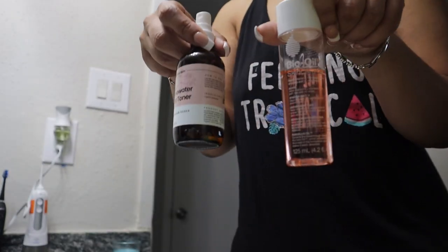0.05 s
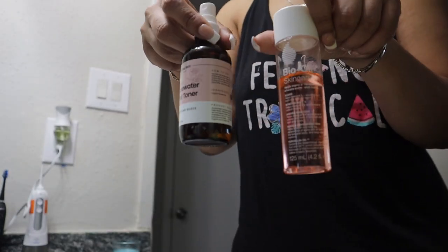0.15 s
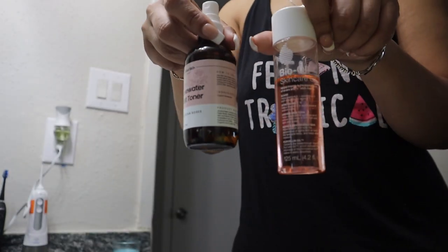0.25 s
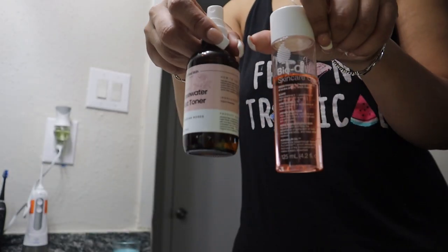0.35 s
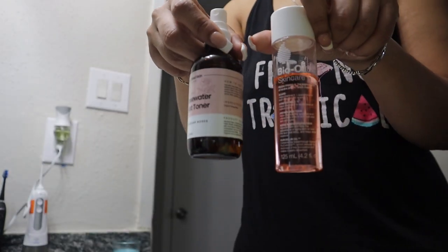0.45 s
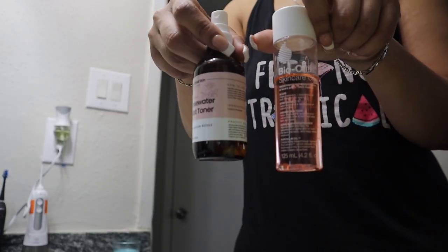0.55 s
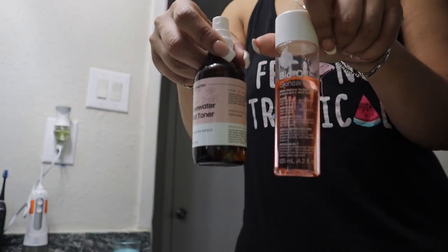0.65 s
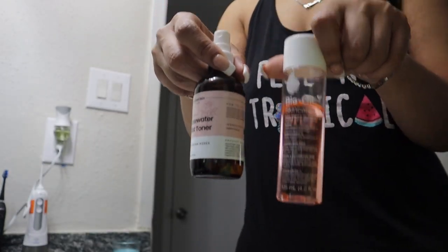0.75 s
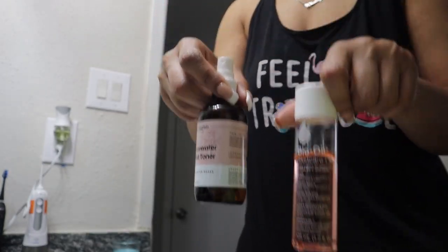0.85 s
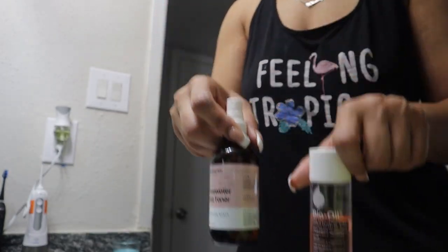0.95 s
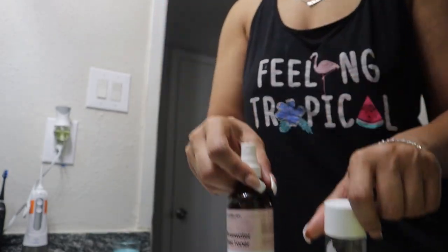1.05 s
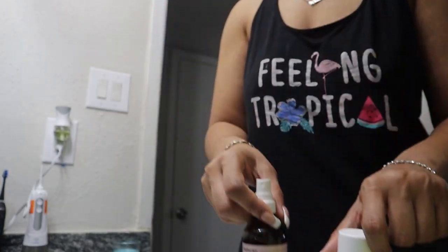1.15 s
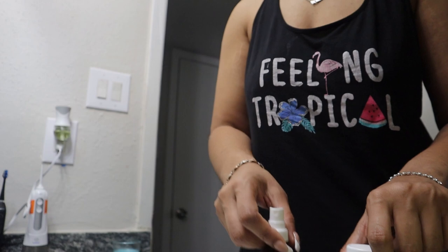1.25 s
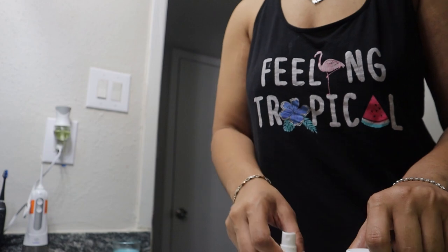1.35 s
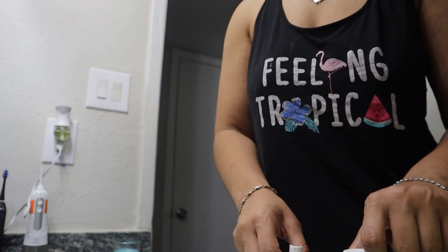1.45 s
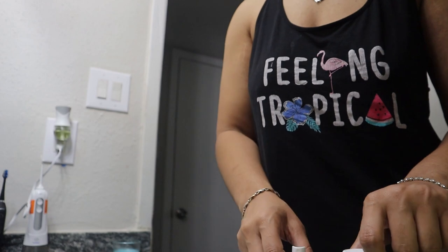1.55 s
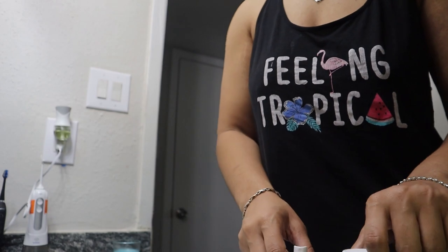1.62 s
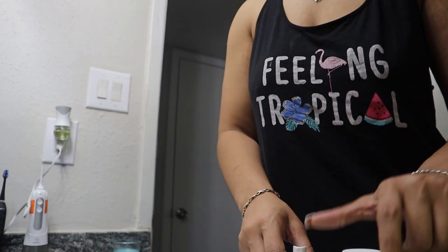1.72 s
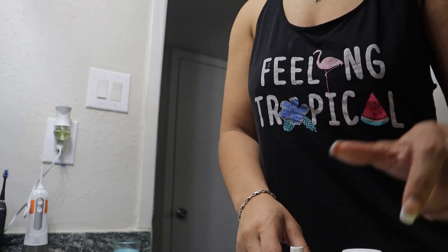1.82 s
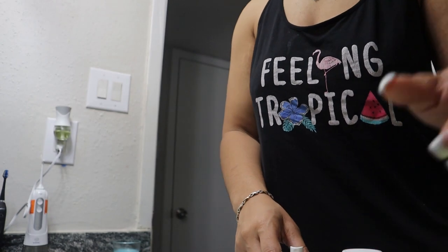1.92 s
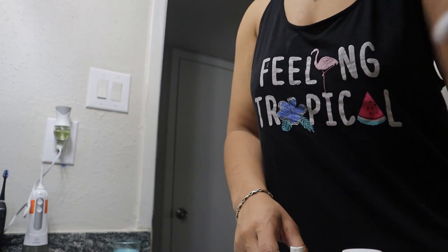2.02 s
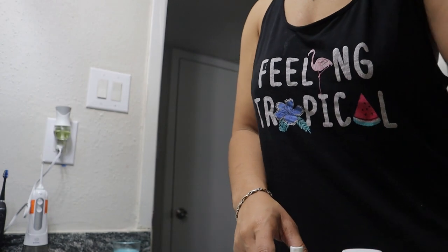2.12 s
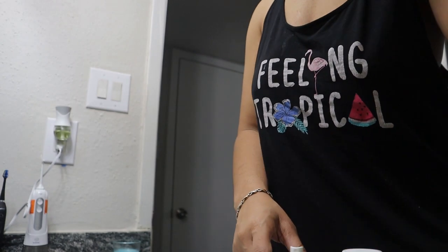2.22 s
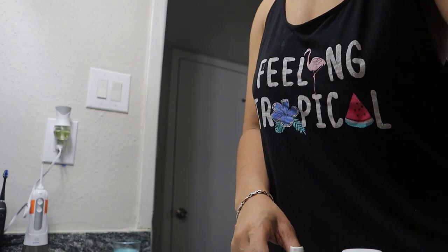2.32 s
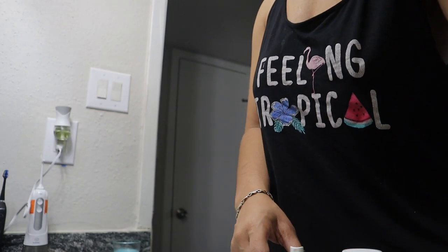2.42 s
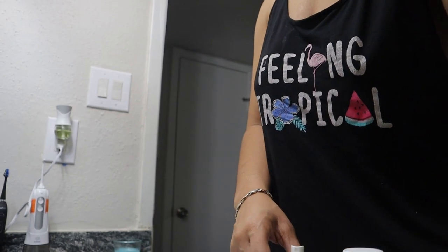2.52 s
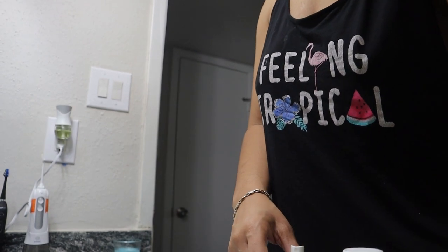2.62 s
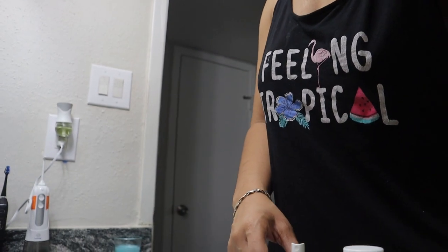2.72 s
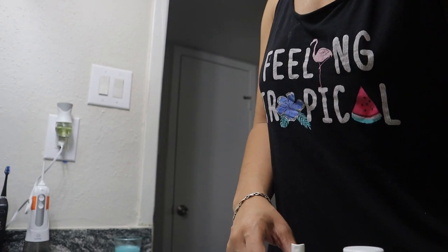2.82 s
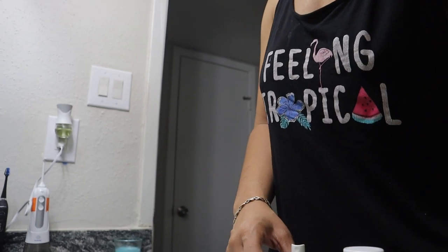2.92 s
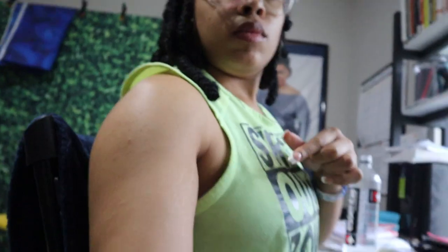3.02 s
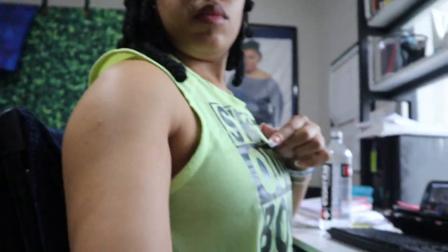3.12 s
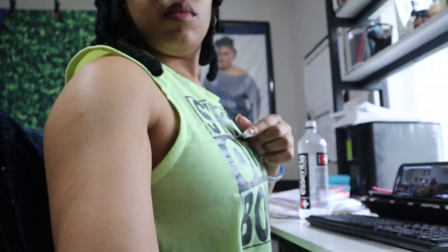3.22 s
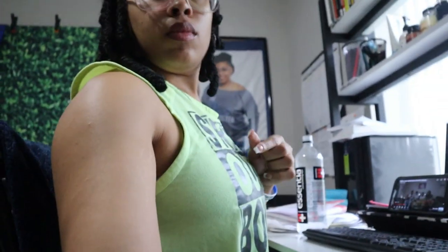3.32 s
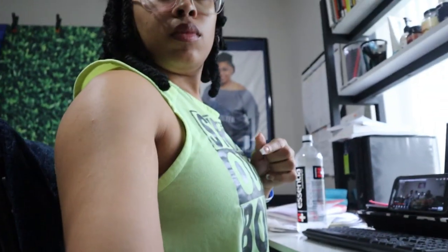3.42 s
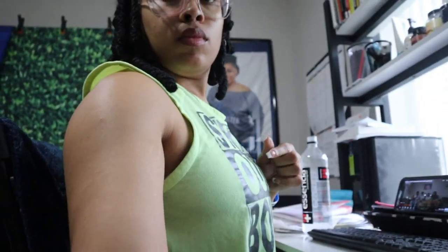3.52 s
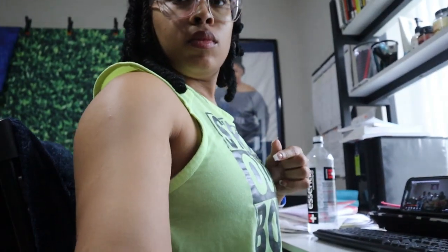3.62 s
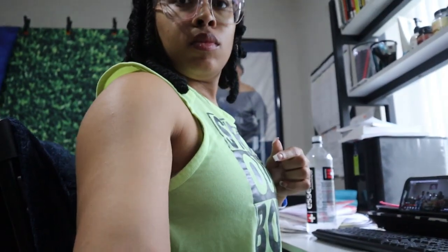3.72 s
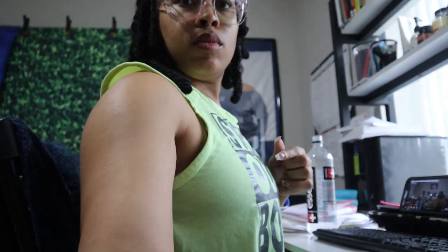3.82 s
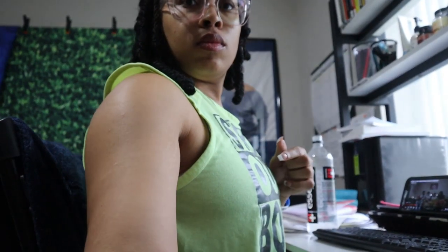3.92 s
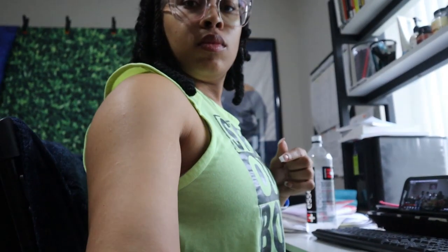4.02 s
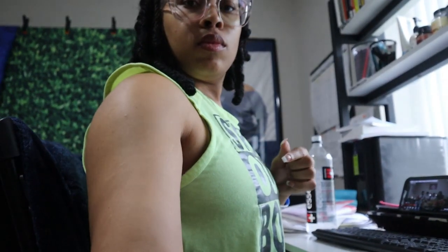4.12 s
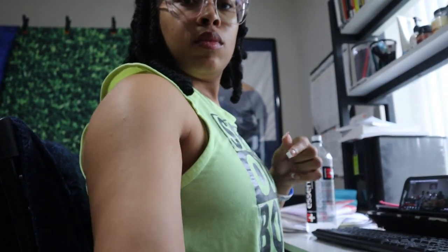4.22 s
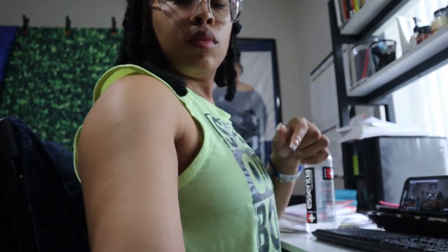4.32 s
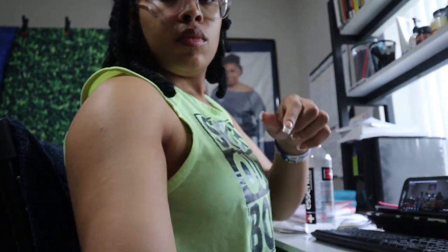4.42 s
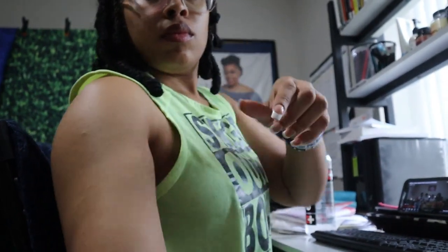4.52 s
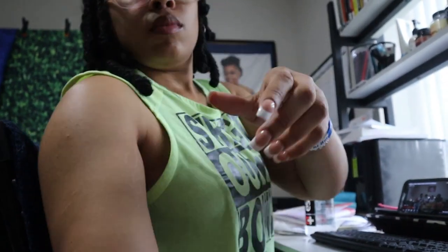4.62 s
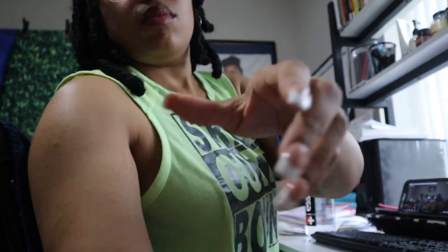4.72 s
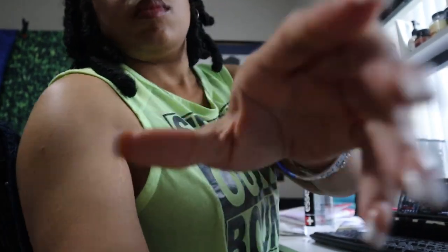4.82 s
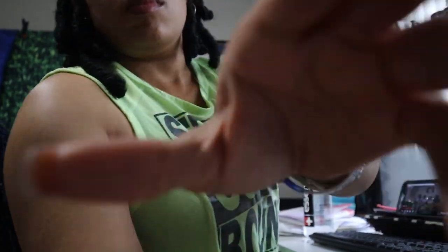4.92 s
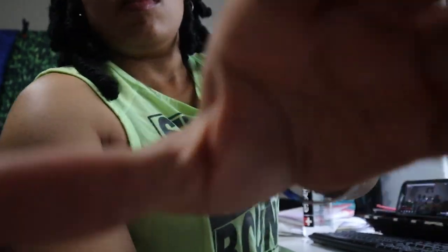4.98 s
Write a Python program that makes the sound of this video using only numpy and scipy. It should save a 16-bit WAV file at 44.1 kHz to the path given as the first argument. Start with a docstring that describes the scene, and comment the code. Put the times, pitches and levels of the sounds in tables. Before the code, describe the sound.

In a bare, slightly echoing bathroom with low hum and soft hiss, a glass bottle thuds on a stone counter, then a plastic one knocks louder and rocks as it settles. A hand brushes the camera with a dry hiss and a button clicks close by. After a tiny gap, in a quieter-humming study, close bumps, nail ticks and cloth shuffles are followed by light taps and a dull knock.

```python
"""A low hum with soft rumble and hiss is heard first; then a glass and a plastic bottle are set on stone.
A hand brushes the camera with a dry hiss and a button clicks. After a very short silence, in a study,
fingers tick and bump on the camera, cloth shuffles and something knocks dully.
Impacts are pulses, noise and decaying modes; friction is shaped noise; the hum is a few sines."""
import sys
import numpy as np
from scipy import signal
from scipy.fft import rfft, irfft, next_fast_len
from scipy.io import wavfile
from scipy.ndimage import uniform_filter1d

SR = 44100
rng = np.random.default_rng(int(sys.argv[2]) if len(sys.argv) > 2 else 0)


def master_out(mix):
    """Clip the mix to full scale and print it as 16-bit PCM to the path in sys.argv[1]."""
    frames = np.transpose(np.atleast_2d(mix))
    ceiling = np.clip(frames, -1, 1)
    pcm = np.round(ceiling * 32767).astype(np.int16)
    wavfile.write(sys.argv[1], SR, pcm)


N = 222749
TIME = np.arange(N) / SR

# In every table named spectrum or width the columns are (frequency [Hz], relative level [dB]).
# In every table of modes: (frequency [Hz], relative level [dB], decay t60 [s]).
# In every table of hits: (time [s], level [dB], brightness [dB per octave], contact noise t60 [s]).

# silence between the two rooms: (start [s], end [s])
SILENCE = (2.974, 3.011)
# stereo width of distant impacts, side against mid: (frequency [Hz], relative level [dB])
FAR_WIDTH = [(60, -67), (300, -27.5), (800, -20), (1600, -13), (2600, -10.5), (4200, -2.5), (10000, 5)]


def amp(db):
    """Level as a logarithm: decibels to amplitude gain."""
    return 10 ** (np.asarray(db) / 20)


def rms(x):
    """Effective value: the root of the mean power."""
    return np.sqrt(np.mean(x ** 2) + 1e-20)


def colour(x, spectrum, tilt_db=0):
    """Minimum-phase filtering: the folded cepstrum of a spectrum, tilted per octave, gives a causal response."""
    size = 2 * next_fast_len(x.shape[-1] // 2 + SR // 20)
    octave = np.log2(np.maximum(np.arange(size // 2 + 1) * SR / size, 10))
    hz, db = np.transpose(spectrum)
    gain_db = np.interp(octave, np.log2(hz), db) + tilt_db * (octave - octave.mean())
    cepstrum = irfft(np.log(amp(gain_db)))
    # fold the negative times onto the positive ones
    cepstrum[1:size // 2] *= 2
    cepstrum[size // 2 + 1:] = 0
    response = np.exp(rfft(cepstrum))
    return irfft(rfft(x, size) * response)[..., :x.shape[-1]]


def tilted(x, tilt_db):
    """Spectral tilt: a constant slope in dB per octave makes a sound brighter or duller."""
    return colour(x, [(1000, 0)], tilt_db)


def noise(spectrum):
    """Stationary coloured noise: filtered white noise, scaled to rms 1."""
    x = colour(rng.standard_normal(N), spectrum)
    return x / rms(x)


def drift(rate):
    """Slow random modulation: chance values, rate per second, joined by straight lines."""
    return np.interp(TIME * rate, np.arange(N), rng.standard_normal(N))


def stereo(mid, side):
    """Sum and difference: left and right from mid and side."""
    return np.array([mid + side, mid - side])


def add(out, s, x):
    """Superposition: mix a short sound in at time s."""
    start = round(s * SR)
    out[..., start:start + x.shape[-1]] += x[..., :N - start]


def blows(rows, modes, spectrum, width, push_db, modes_db, room_db, room_t60):
    """Impact: a contact pulse and a brief noisy rattle, the body's decaying modes, and a reverberant tail."""
    out, t = np.zeros((2, N)), TIME[:SR // 2]
    onset_s = 0.00055   # a contact takes this long to set the modes ringing
    ring = 0
    for k, (hz, db, t60) in enumerate(modes):
        # neighbouring modes start with opposite signs
        ring = ring + (-1) ** k * amp(db - 60 * t / t60) * np.sin(2 * np.pi * hz * t)
    ring = ring * np.tanh(t / onset_s) ** 2
    push = colour(1. * (t == 0), spectrum)
    direct = amp(push_db) * push / rms(push) + amp(modes_db) * ring / rms(ring)
    tail_envelope = amp(-60 * t / room_t60) * (1 - np.exp(-t / 0.0015))
    for s, level_db, tilt_db, t60 in rows:
        rattle = colour(rng.standard_normal((2, len(t))) * amp(-60 * t / t60), spectrum)
        tail = colour(rng.standard_normal((2, len(t))) * tail_envelope, spectrum)
        diffuse = rattle / rms(rattle) + amp(room_db) * tail / rms(tail)
        mid, side = tilted(direct + diffuse, tilt_db)
        gain = amp(level_db) / rms(mid[:SR // 50])   # level of the mid over the first 20 ms
        add(out, s, gain * stereo(mid, colour(side, width)))
    return out


def stroke(start, length, level_db, swell_db, attack_s, release_t60, arch_db):
    """Friction envelope: a rubbing movement takes hold, arches midway, swells or slackens, then lifts off."""
    t = TIME - start
    progress = np.clip(t / length, 0, 1)
    lift_db = 60 * np.maximum(t - length, 0) / release_t60
    gain_db = level_db + swell_db * (progress - .5) + arch_db * np.sin(np.pi * progress) - lift_db
    return np.clip(t / attack_s, 0, 1) * amp(gain_db)


def room_tone(mid_db=-46.5, side_db=-50, waver_db=2.0, wander=0.36, study_hum_db=-4.0):
    """Stationary background: rumble and wide hiss under mains harmonics that waver, weaker in the study."""
    # mains hum in the bathroom, before wavering: (frequency [Hz], rms level [dB])
    hum_lines = [(119.7, -48), (240, -63), (359, -60.5)]
    # room air common to both ears: (frequency [Hz], relative level [dB])
    air_mid_spectrum = [(20, -6), (40, 1), (80, 3.5), (160, -3), (260, -9.5), (500, -16.5), (1000, -19),
                        (2000, -24), (4000, -30.5), (8000, -40), (11500, -44.5), (16000, -75)]
    # room air opposed between the ears: (frequency [Hz], relative level [dB])
    air_side_spectrum = [(25, -13), (114, 4), (223, 9), (263, 10.5), (659, 8.5), (863, 6.5), (1290, 5),
                         (2350, 0), (2550, 0.5), (6740, -10.5), (14000, -24.5), (16000, -50.5)]
    hum = 0
    for hz, db in hum_lines:
        level = np.sqrt(2) * amp(db + waver_db * drift(3.7))
        phase = 2 * np.pi * hz * TIME + wander * drift(5.16)   # wander in radians
        hum = hum + level * np.sin(phase)
    hum = hum * amp(study_hum_db * (TIME > SILENCE[1]))
    return stereo(hum + amp(mid_db) * noise(air_mid_spectrum), amp(side_db) * noise(air_side_spectrum))


def cloth(flutter_db=1.7, grain_db=3):
    """Textile friction: a dull scuff and a bright swish share the power; the weave roughens both."""
    # shuffles: (start [s], length [s], level [dB], swell from start to end [dB], power share of swish [0-1])
    shuffles = [(3.504, 0.217, -53.5, 2, 0.05), (3.82, 0.038, -43, 7, 0.01), (3.873, 0.04, -45, 13, 0.6),
                (3.946, 0.082, -49.5, -10, 0.5), (4.038, 0.014, -50, 5, 0.7), (4.16, 0.088, -56, -5, 0.19),
                (4.325, 0.051, -50.5, 8, 0.02), (4.451, 0.24, -59, -8, 0.4)]
    # dull scuff: (frequency [Hz], relative level [dB])
    scuff_spectrum = [(120, -6.5), (300, 7), (700, -1.5), (900, -3.5), (1250, 1), (2000, -28), (5000, -58)]
    # bright swish: (frequency [Hz], relative level [dB])
    swish_spectrum = [(400, -19), (1000, -6), (1350, 2), (1750, -0.5), (2350, 8), (2900, 2.5), (3300, -2),
                      (4300, -11), (12000, -31), (16000, -56)]
    # side against mid: (frequency [Hz], relative level [dB])
    cloth_width = [(200, -23), (1200, -4), (2400, -7), (3600, 4), (10000, 9)]
    scuff, swish = 0, 0
    for *movement, bright in shuffles:
        gain = stroke(*movement, attack_s=0.015, release_t60=0.12, arch_db=1)
        bright = np.clip(bright, 0, 1)
        scuff = scuff + gain * np.sqrt(1 - bright)
        swish = swish + gain * np.sqrt(bright)
    mid, side = [scuff * noise(scuff_spectrum) + swish * noise(swish_spectrum) for _ in range(2)]
    grit = amp(flutter_db * drift(90) + grain_db * drift(900))
    return grit * stereo(mid, colour(side, cloth_width))


def brush(grain_db=1.5, flutter_db=1.5, snag_t60=0.024, lean=0.36, catches_per_s=200, catch_db=16):
    """Stick-slip friction: uneven tiny slips, small catches and bigger snags of skin, leaning to the right."""
    # strokes: (start [s], length [s], level before tilt [dB], swell from start to end [dB],
    #           brightness [dB per octave], release t60 [s])
    strokes = [(2.004, 0.024, -41.5, 6, 0.5, 0.11), (2.036, 0.05, -45, 7, 0.5, .2),
               (2.071, 0.047, -41, 5, 0.9, 0.21), (2.117, 0.045, -40.5, 2.5, 0, 0.28),
               (2.262, 0.31, -49, -5, 0.1, 0.39), (2.603, 0.38, -59.5, -15, -0.5, 0.31),
               (3.361, 0.012, -40, -9, 1.5, .28), (3.425, 0.051, -51, 5, 0, 0.23),
               (3.935, .015, -56, -8, 8, 0.34), (4.674, 0.32, -60.5, 7.5, -1, 0.5)]
    # skin catches and slips: (time [s], level before tilt [dB], brightness [dB per octave])
    snags = [(2.018, -47, -0.5), (2.0552, -43, 1.5), (2.0754, -33, 3.5), (2.081, -44, -0.5),
             (2.088, -44, 2.5), (2.1482, -49.5, -4.5), (2.2593, -53, -2), (2.442, -49, 2), (2.475, -58, 6),
             (2.553, -47, 0), (2.616, -50.5, 3), (3.527, -53, 4)]
    # dry hiss: (frequency [Hz], relative level [dB])
    hiss_spectrum = [(210, -62), (350, -5.5), (754, 0.5), (817, 1), (974, -1.5), (1820, -2.5), (2200, 2),
                     (2500, 0.5), (3500, -2.5), (8310, -17), (10700, -8.5), (13900, -27), (16000, -78)]
    # side against mid: (frequency [Hz], relative level [dB])
    brush_width = [(200, -18), (1000, -13), (2400, -9), (4400, 0), (8000, 4.5), (15000, 10)]
    grit = rng.standard_normal((2, N)) * amp(grain_db * drift(1500) + flutter_db * drift(110))
    catches = rng.random(N) < catches_per_s / SR   # at random moments
    grit += amp(catch_db) * catches * rng.standard_normal((2, N))
    grit /= rms(grit)
    slips = np.zeros((2, N))
    for s, length, db, swell_db, tilt_db, release_t60 in strokes:
        rub = grit * stroke(s, length, db, swell_db, attack_s=0.01, release_t60=release_t60, arch_db=3)
        add(slips, s, tilted(rub[:, round(s * SR):][:, :SR], tilt_db))
    snag_decay = amp(-60 * TIME[:SR // 50] / snag_t60)
    for s, db, tilt_db in snags:
        snag = rng.standard_normal((2, SR // 50)) * snag_decay
        add(slips, s, amp(db) * tilted(snag / rms(snag), tilt_db))
    # white noise of rms 1 would leave the hiss filter at rms 1
    mid, side = colour(slips, hiss_spectrum) / rms(colour(rng.standard_normal(N), hiss_spectrum))
    leaning_side = (side - lean * mid) / np.hypot(1, lean)
    return stereo(mid, colour(leaning_side, brush_width))


def handling(button_pan_db=2.0):
    """Near-field impacts: clicks and soft bumps at the microphone with little room, and a knock further off."""
    # side against mid close by: (frequency [Hz], relative level [dB])
    near_width = [(60, -24), (300, -19), (700, -20.5), (1300, -2.5), (2200, -3), (3600, 8), (7000, 1.5),
                  (14000, 5)]
    # Hits: (time [s], level [dB], brightness [dB per octave], contact noise t60 [s])
    # Modes: (frequency [Hz], relative level [dB], decay t60 [s])
    # Spectra: (frequency [Hz], relative level [dB])
    # a button is touched, then clicks: hits, modes, spectrum
    button_hits = [(2.803, -42, -4, 0.076), (2.8467, -23.5, 0.5, 0.0091), (2.8525, -33, -3, 0.0098),
                   (2.8605, -43, 0, 0.0082)]
    button_modes = [(1080, 3.5, 0.022), (1273, 0.5, 0.032), (1950, -3.5, 0.03), (2595, -20.5, 0.034),
                    (2920, -22, 0.015), (3750, -10, 0.018)]
    button_spectrum = [(60, -45), (350, -11), (700, -4.5), (1150, 13), (1600, -8), (2100, -4),
                       (4000, -11.5), (7000, -19.5), (10500, -26), (16000, -67)]
    # fingernails on the camera shell: hits, modes, spectrum
    nail_hits = [(3.083, -38, 0, 0.065), (3.177, -37, 0, 0.051), (3.3648, -31.5, -1, 0.053),
                 (3.3678, -25, -6, 0.012), (3.3772, -28, -3.5, 0.027), (3.391, -35.5, 0, 0.026),
                 (3.4235, -33.5, -5.5, 0.02), (3.4655, -43, -2.5, 0.022), (3.4695, -35, -5, .03),
                 (3.510, -33.5, -5.5, 0.03), (3.566, -50, -3.5, .02), (3.585, -48, -2.5, 0.058),
                 (3.640, -44.5, -1, .025), (3.700, -47, -5, 0.034), (3.837, -52, -1, 0.018),
                 (3.867, -43, -4, .02), (3.8715, -41, -4, 0.012), (3.9015, -44.5, -0.5, 0.022),
                 (3.910, -41.5, 1, 0.023), (4.06, -50, 5.5, 0.037)]
    shell_modes = [(365, -2, 0.039), (990, 9, 0.023), (1330, 2.5, 0.053), (2330, -4, 0.019),
                   (4200, -31, 0.045)]
    shell_spectrum = [(25, -11.5), (90, 2), (250, -1.5), (600, 4.5), (1200, 2.5), (1600, -3), (2400, -1),
                      (4000, -18), (7000, -35), (10500, -38), (16000, -58)]
    # dry crackles as the grip shifts: hits, modes, spectrum
    crackle_hits = [(3.364, -40, -3.5, 0.017), (3.392, -47.5, -1.5, .02), (3.4287, -56, 3, .015),
                    (3.434, -50, 0, .02), (3.439, -56.5, -2, .015), (3.4535, -50, -4, .015),
                    (3.4645, -49.5, 3, .015)]
    crackle_modes = [(2250, 8, 0.027), (4180, 3, .05), (4770, -1, 0.045), (5640, -3, 0.036)]
    crackle_spectrum = [(500, -18), (2200, 5.5), (3300, -9), (5000, 0), (8000, -8), (10500, -10),
                        (16000, -44)]
    # light, hollow taps: hits, modes, spectrum
    tap_hits = [(4.7587, -35, 1, 0.0067), (4.7618, -41.5, 3, 0.0079), (4.806, -49, -4, 0.04),
                (4.821, -50, -4, 0.034), (4.891, -44, -0.5, 0.024), (4.894, -36.5, -2, .015)]
    tap_modes = [(410, -9, 0.056), (1060, 4, 0.036), (1340, 3, 0.02), (2280, -14, 0.015)]
    tap_spectrum = [(40, -16), (400, 8.5), (700, -3.5), (1300, -1), (1700, -6), (2300, 2), (3200, -23),
                    (7000, -39), (16000, -65)]
    # one sharp snap that leaves a faint ring: hits, modes, spectrum
    snap_hits = [(3.9378, -29, 4, 0.0063), (3.9398, -28, 0, 0.0027)]
    snap_modes = [(990, 3, 0.025), (1325, 10, 0.024), (1320, -16.5, 0.36), (1775, 9, 0.028),
                  (2267, 8, 0.038), (2275, -11, 0.27), (2510, 3, 0.023), (2820, 8.5, 0.013),
                  (4550, 2, 0.0089)]
    snap_spectrum = [(50, 10), (120, 10), (400, 11), (1000, -4), (2600, 1), (3800, -8), (5200, -3.5),
                     (8000, -19), (10500, -12), (16000, -45)]
    # soft bumps of the hand on the camera: hits, modes, spectrum
    bump_hits = [(3.361, -19, -1.5, 0.053), (3.369, -26, -4.5, 0.086), (3.382, -24, 5.5, 0.043),
                 (3.4215, -27, 3, 0.081), (3.4275, -26, 2.5, 0.29), (3.5055, -24.5, -1, 0.048),
                 (3.509, -23.5, 2.5, 0.048), (3.526, -37, -2.5, 0.043), (3.591, -43, -2, .04),
                 (3.645, -39.5, -2.5, 0.24), (3.725, -37.5, -8.5, 0.4), (4.074, -28.5, -1, 0.047)]
    bump_modes = [(46.3, 5.5, 0.27), (100, 1, 0.047), (145, 10, 0.043), (221.6, 14, 0.072),
                  (304, 0.5, 0.17), (449, -0.5, 0.048)]
    bump_spectrum = [(20, -20), (45, 9.5), (110, 2.5), (200, 2.5), (300, -3.5), (480, -12), (900, -25.5),
                     (1800, -41), (5000, -65.5), (11000, -80), (16000, -105)]
    # dull knock with a rebound: hits, modes, spectrum
    knock_hits = [(4.9076, -16.5, -1, 0.025), (4.9168, -27, 3, 0.043), (4.9365, -27.5, -2.5, 0.039)]
    knock_modes = [(202, -7, 0.19), (232, -4, 0.19), (259.4, 4, 0.19), (283, -3.5, 0.2), (373, -1, 0.15),
                   (465, -6, 0.13), (585, -0.5, 0.048), (685, -3.5, 0.055), (803, -6.5, 0.077),
                   (963, -17, 0.14), (1930, -24, 0.1)]
    knock_spectrum = [(30, -27), (130, -16.5), (255, 4), (400, -7.5), (690, -11), (900, -20), (1300, -33),
                      (1900, -28), (3000, -40.5), (8000, -61), (16000, -88)]
    button = blows(button_hits, button_modes, button_spectrum, near_width,
                   push_db=-1, modes_db=6.0, room_db=-10.0, room_t60=0.15)
    button = button * amp([[-button_pan_db], [button_pan_db]])   # towards the right
    clicks = blows(nail_hits, shell_modes, shell_spectrum, near_width,
                   push_db=-1.0, modes_db=-1.5, room_db=-8.5, room_t60=0.32)
    crackles = blows(crackle_hits, crackle_modes, crackle_spectrum, near_width,
                     push_db=-7, modes_db=-3.5, room_db=-0.5, room_t60=0.21)
    taps = blows(tap_hits, tap_modes, tap_spectrum, near_width,
                 push_db=-2.0, modes_db=4, room_db=-7.5, room_t60=0.4)
    snap = blows(snap_hits, snap_modes, snap_spectrum, near_width,
                 push_db=-13.0, modes_db=-0.5, room_db=-14.5, room_t60=0.14)
    bumps = blows(bump_hits, bump_modes, bump_spectrum, near_width,
                  push_db=2, modes_db=2, room_db=-7, room_t60=.35)
    knock = blows(knock_hits, knock_modes, knock_spectrum, FAR_WIDTH,
                  push_db=-6.5, modes_db=6.5, room_db=2.5, room_t60=0.26)
    return button + clicks + crackles + taps + snap + bumps + knock


def bottles():
    """Modal impact: glass thuds and tinkles, hollow plastic knocks, and the bare bathroom reverberates."""
    # Hits: (time [s], level [dB], brightness [dB per octave], contact noise t60 [s])
    # Modes: (frequency [Hz], relative level [dB], decay t60 [s])
    # Spectra: (frequency [Hz], relative level [dB])
    # glass bottle meets the counter and is later nudged: hits, modes, spectrum
    glass_hits = [(1.389, -41.5, 8, 0.016), (1.3918, -16.5, 1, 0.01), (1.395, -29, 2.5, 0.024),
                  (1.416, -32, 2, .04), (1.733, -41.5, -4, .06), (1.762, -35.5, -2.5, .04)]
    glass_modes = [(69, -2.5, 0.48), (228.4, 1.5, 0.38), (302, -7, 0.3), (375, -14, 0.23),
                   (457, -18.5, 0.73), (853, -14.5, 0.14), (1710, -13, 0.17), (2380, -22, 0.073),
                   (3900, -15, 0.19), (4080, -22.5, 0.091), (4170, -22.5, 0.032)]
    glass_spectrum = [(30, -39.5), (75, -2), (130, -12), (230, -2.5), (305, 0), (430, -10.5), (600, -27.5),
                      (1200, -38.5), (1700, -32), (2400, -28), (3300, -45), (3950, -33.5), (4600, -51.5),
                      (10000, -73.5), (16000, -89)]
    # plastic bottle lands while still gripped: hits, modes, spectrum
    # its close pair of modes near 4.3 kHz beats, so that their ring swells after the hit
    plastic_hits = [(1.5716, -16, 2.5, 0.0067), (1.5738, -10.5, -1.5, 0.019), (1.5915, -32, 2.5, 0.03),
                    (1.611, -34, 1, 0.039)]
    plastic_modes = [(75.6, -9.5, 0.46), (234, -9, 0.27), (304.2, -3.5, 0.23), (357, 0, 0.18),
                     (462, -12, 0.45), (575, 1, 0.22), (644, -2, 0.27), (755, 1.5, 0.27), (820, -7, 0.26),
                     (1008, 0, 0.23), (1392, -3, 0.25), (1464, 1.5, 0.23), (1690, -5, 0.3),
                     (1766, -8, 0.21), (1960, -4, 0.19), (2105, -9, 0.23), (2236, -9, 0.2),
                     (2342, -5, 0.19), (2512, -9, 0.21), (2859, -9, .11), (4700, -30, .13),
                     (4340, -25, 0.3), (4344, -25, 0.3)]
    plastic_spectrum = [(40, -14), (70, -11), (140, -6.5), (280, 8), (480, -4), (750, 7), (1000, -0.5),
                        (1220, -6), (1440, 0.5), (1850, -4), (2500, -8), (3200, -18.5), (3900, -45),
                        (6000, -47), (11000, -62.5), (16000, -69)]
    # let go, the plastic bottle rocks and settles, its close pair beating again: hits, modes, spectrum
    settle_hits = [(1.8795, -34, -5, 0.031), (1.8842, -23.5, 0.5, 0.028), (1.8862, -21, 2.5, 0.039),
                   (1.8955, -21.5, -1, 0.015), (1.9037, -24, 0.5, .025)]
    settle_modes = [(234, -7, 0.17), (321.4, -7, 0.25), (506, -10.5, 0.11), (641, -8, 0.1),
                    (729, 5.5, 0.12), (827, 1.5, 0.12), (1160, -4.5, 0.077), (1457, -9, 0.25),
                    (1689, -10.5, 0.2), (1970, -2, 0.077), (2280, -6, .14), (2375, -8, 0.14),
                    (2870, -18.5, .1), (4720, -35, 0.13), (4298, -25, 0.22), (4306, -25, 0.22)]
    settle_spectrum = [(60, -32), (150, -13), (300, 3.5), (520, -5), (750, 8), (1000, -4), (1700, -5),
                       (2600, -11.5), (3300, -24.5), (4200, -32), (6000, -48.5), (11000, -62), (16000, -74)]
    glass = blows(glass_hits, glass_modes, glass_spectrum, FAR_WIDTH,
                  push_db=8.0, modes_db=8.0, room_db=9.0, room_t60=0.25)
    plastic = blows(plastic_hits, plastic_modes, plastic_spectrum, FAR_WIDTH,
                    push_db=-2.5, modes_db=0.0, room_db=-1.5, room_t60=0.29)
    settle = blows(settle_hits, settle_modes, settle_spectrum, FAR_WIDTH,
                   push_db=-17, modes_db=2.5, room_db=-5.5, room_t60=0.33)
    return glass + plastic + settle


def scene():
    """Superposition of all sources, with a moment of near silence between the two rooms."""
    silent = 1. * ((TIME > SILENCE[0]) & (TIME < SILENCE[1]))
    silent = uniform_filter1d(silent, size=90)   # edges of about 2 ms
    sources = room_tone() + cloth() + brush() + handling() + bottles()
    return sources * amp(-34 * silent)


def record(dry):
    """Saturation and band limiting: peaks clip at full scale, then a steep low-pass cuts the top."""
    cutoff_hz = 15800
    low_pass = signal.ellip(10, .1, 80, cutoff_hz, fs=SR, output="sos")
    return signal.sosfilt(low_pass, np.clip(dry, -1, 1))


dry = scene()
out = record(dry)
master_out(out)
```